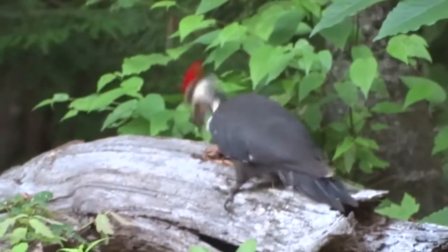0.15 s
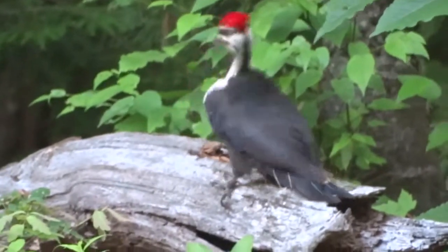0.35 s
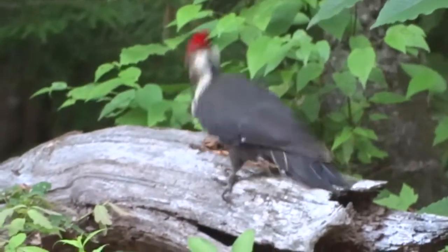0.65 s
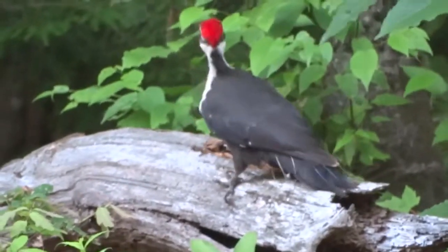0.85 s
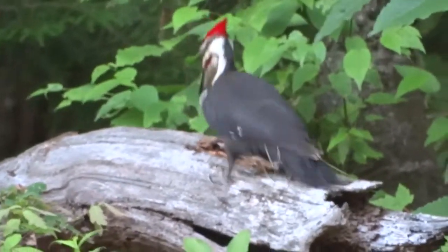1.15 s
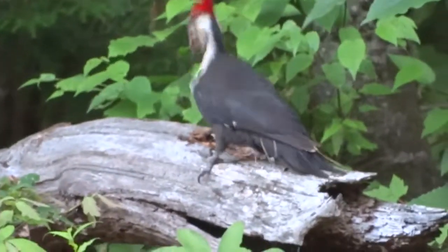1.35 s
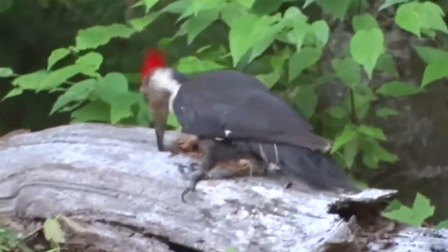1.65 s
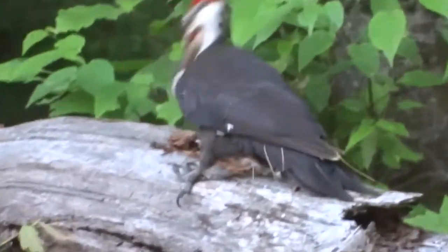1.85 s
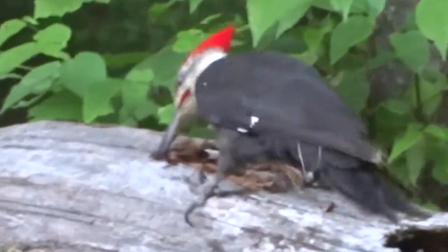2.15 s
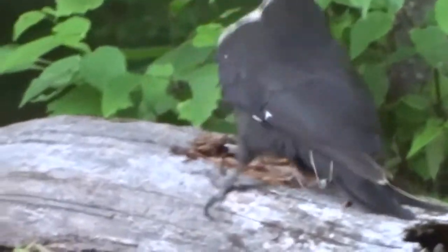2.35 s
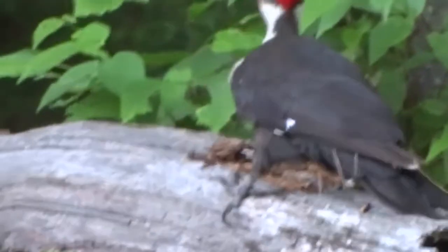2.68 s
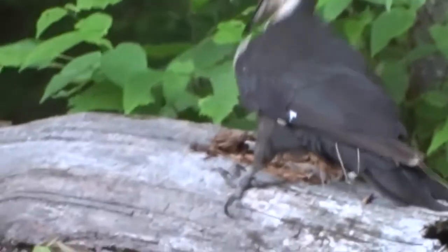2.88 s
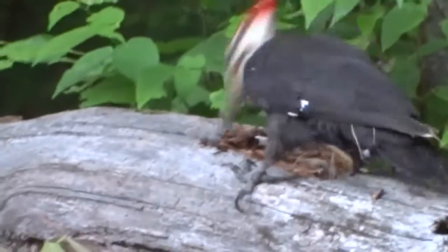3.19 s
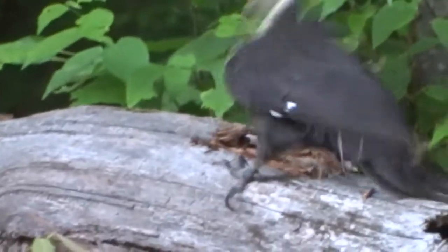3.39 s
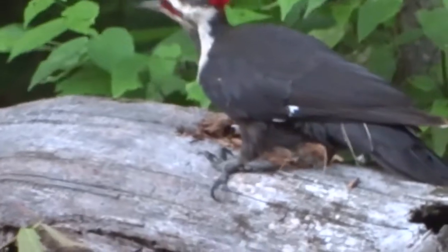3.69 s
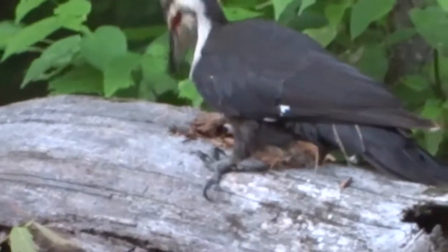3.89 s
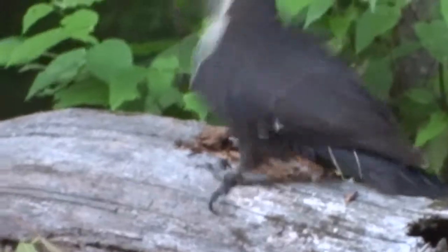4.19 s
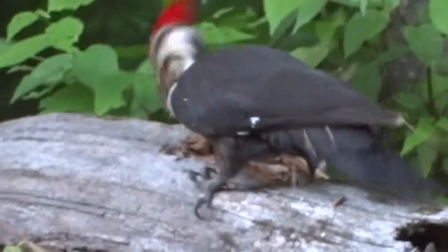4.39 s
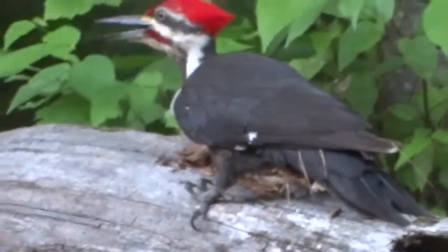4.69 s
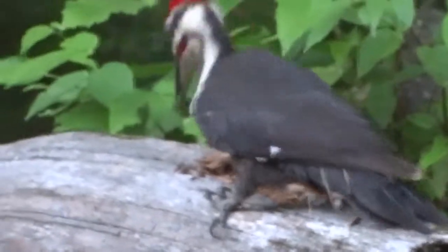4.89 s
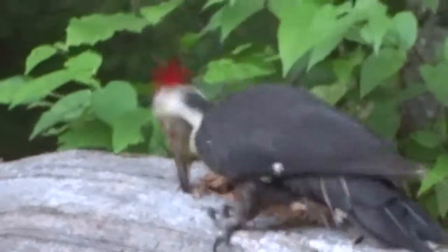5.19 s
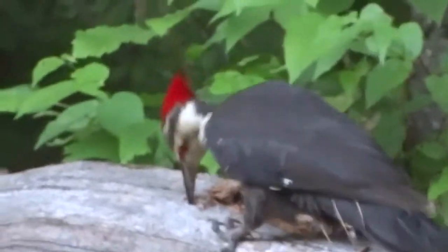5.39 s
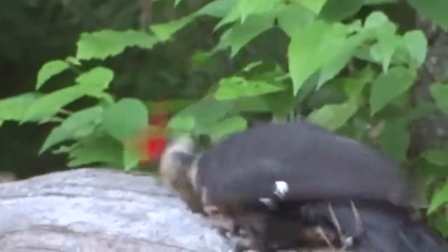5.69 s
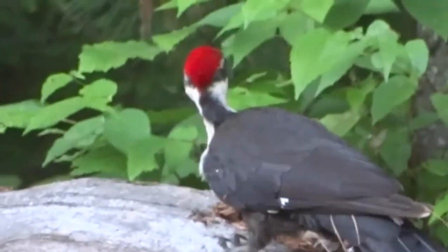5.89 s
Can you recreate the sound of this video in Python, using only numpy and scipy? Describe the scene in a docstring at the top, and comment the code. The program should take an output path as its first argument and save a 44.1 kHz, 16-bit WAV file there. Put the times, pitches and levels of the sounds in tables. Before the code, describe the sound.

Near the microphone, a woodpecker strikes a decaying log in sharp, unevenly spaced single knocks, some hard and some softer, with small crackles of breaking wood and little echo. Distant small birds give high whistles before the first blow, then a fading twitter and a few chirps, and later a very faint pulsing song. A smooth, bright hiss runs under everything in the forest.

```python
"""A steady, bright hiss fills a forest, and a small bird whistles thinly far off among the trees.
Half a second in, a large woodpecker starts chiselling at a rotting log with dry, irregular blows.
Each rings the damp wood for a few milliseconds and leaves a grainy tail; now and then a crumb snaps.
Between the blows come a far twitter, light taps of the bill, thin chirps and two low calls.
About three seconds in, a bird sings with two voices at once; the pecking goes on to the end."""
import sys
import numpy as np
from scipy import signal
from scipy.fft import rfft, irfft
from scipy.io import wavfile
from scipy.ndimage import uniform_filter1d

SR = 44100
rng = np.random.default_rng(int(sys.argv[2]) if len(sys.argv) > 2 else 0)


def waveform_to_disk(signal):
    """Save audio, clipped to [-1, 1], as 16-bit WAV at the path in sys.argv[1]."""
    frames = np.transpose(np.atleast_2d(signal))
    scaled = np.clip(frames, -1, 1) * 32767
    samples = np.round(scaled).astype(np.int16)
    wavfile.write(sys.argv[1], SR, samples)


N = 266496


def gain_of(db):
    """Turns decibels into a number to multiply a sound by."""
    return 10 ** (np.asarray(db) / 20)


def evened(x):
    """Scales a signal to an average strength (rms) of 1."""
    return x / np.sqrt(np.mean(x ** 2) + 1e-20)


def read(points, hz):
    """Looks up a table at any pitch, filling in between its rows."""
    f, value = np.transpose(points)
    return np.interp(np.log(hz + 1), np.log(f + 1), value)


def add(mix, s, sound):
    """Mixes a sound in, starting at s seconds."""
    start = round(s * SR)
    sound = sound[max(-start, 0):]
    part = mix[max(start, 0):][:len(sound)]
    part += sound[:len(part)]


def click_from(spectrum):
    """The quickest-dying click that has the given strength at each pitch."""
    log_gain = np.log(np.maximum(np.concatenate([spectrum, spectrum[-2:0:-1]]), 1e-5))
    return np.fft.ifft(np.exp(np.conj(signal.hilbert(log_gain)))).real


# tone of the hiss: (pitch [Hz], relative level [dB])
HISS_TONE = [(18, -85), (30, -61.5), (69, -41), (177, -39.5), (276, -30), (312, -28), (345, -33),
             (371, -24.5), (537, -19.5), (655, -15), (902, -10.5), (971, -11), (1410, -12.5), (1590, -14.5),
             (1760, -11), (2300, -11), (2880, -8), (3170, -7.5), (4250, -3.5), (4980, 0.63), (5350, -2),
             (5700, -8.5), (6000, -16), (7160, -23), (8100, -26.5), (10900, -48), (14200, -73),
             (22000, -120)]
# how alike left and right are: (pitch [Hz], likeness [-1 to 1])
EAR_LIKENESS = [(60, .82), (550, 0.82), (2400, 0.86), (5200, 0.97), (6500, 0.76), (7300, 0.23),
                (8400, -0.63), (10400, 0.23)]
# drift of the low part: (time [s], level [dB])
LOW_DRIFT = [(0, 7), (.3, 1), (.7, 3.5), (1.2, 1.4), (2.8, 0), (3.7, 1), (4.7, -1.5), (6.04, -1.5)]
# drift of the high part: (time [s], level [dB])
HIGH_DRIFT = [(0, 3), (.65, 4), (1.55, 1), (2.298, 0.9), (3.7, 0), (4.8, -1), (6.04, -2)]
def hiss(treble_lift_db=1.0, patchy_db=1.03):
    """A smooth, bright background whose low and high parts slowly swell and sink."""
    frames, hz = N // 256 + 5, np.fft.rfftfreq(1024, 1 / SR)
    t = np.arange(frames) * 256 / SR
    a, b, c, d, patches = rng.standard_normal((5, frames, len(hz)))
    likeness = read(EAR_LIKENESS, hz)
    left = a + 1j * b
    right = likeness * left + np.sqrt(1 - likeness ** 2) * (c + 1j * d)
    tone = gain_of(read(HISS_TONE, hz)) * np.clip(hz / 30, 0, 1)
    patches = evened(uniform_filter1d(uniform_filter1d(patches, size=14, axis=0), size=12, axis=1))
    low_db, high_db = (np.interp(t, *np.transpose(drift))[:, None] for drift in (LOW_DRIFT, HIGH_DRIFT))
    treble = read([(1500, 0.019), (3000, 0.98)], hz)
    drift_db = (1 - treble) * low_db + treble * (high_db + treble_lift_db)
    spectra = np.array([left, right]) * tone * gain_of(drift_db + patchy_db * patches)
    _, noise = signal.istft(spectra, nperseg=1024, noverlap=768, time_axis=1, freq_axis=2)
    return evened(noise[:, :N])


def note(length, start_hz, end_hz, depth_hz, db, glide_s=0.111, trill_hz=75, waver=0.539, flutter_db=0.7):
    """One bird note: it swells, slides and flutters, and its pitch zigzags in a quick, uneven trill."""
    t = np.arange(int(length * SR)) / SR
    unsteady = evened(uniform_filter1d(rng.standard_normal(SR), 120))[:len(t)]
    flutter = evened(uniform_filter1d(rng.standard_normal(SR), 500))[:len(t)]
    trill = signal.sawtooth(2 * np.pi * (trill_hz * t + rng.random()), .5) + waver * unsteady
    pitch = end_hz + (start_hz - end_hz) * np.exp(-t / glide_s) + depth_hz * trill
    strength = gain_of(db) * evened(gain_of(flutter_db * flutter)) * signal.windows.hann(len(t))
    return strength * np.sin(2 * np.pi * np.cumsum(pitch) / SR)


# the opening whistles: (time [s], length [s], pitch [Hz], level [dB])
WHISTLES = [(-.07, 0.22, 5365, -37), (0.188, 0.24, 5110, -31), (0.595, 0.13, 5210, -35),
            (0.675, 0.13, 5050, -36.5)]
def whistles(scoop_hz=650, under_hz=4720):
    """A bird slides up into each whistle, while a softer, wide trill runs on underneath."""
    out = np.zeros(N)
    for s, length, hz, db in WHISTLES:
        add(out, s, note(length, hz - scoop_hz, hz, depth_hz=180, db=db, glide_s=.028))
        add(out, s, note(0.36, under_hz, under_hz, depth_hz=443, db=-44.5))
    return out


# the log's own ringing notes: (pitch [Hz], width [Hz], level [dB])
LOG_NOTES = [(360, 74, -13), (453, 46, -5.5), (570, 80, -14), (886, 136, -5.5), (1125, 114, 0),
             (1438, 114, -1), (1840, 229, -10), (2287, 234, 6), (3200, 330, -4), (3446, 81, -5.5),
             (3942, 280, 2.5), (4600, 200, -12), (5270, 320, 4)]
# the hard bill's ringing notes: (pitch [Hz], width [Hz], level [dB])
BILL_NOTES = [(7230, 790, 0.5), (8800, 1300, -18)]
# blows of the bill: (time [s], strength [dB], hardness [dB per octave], distance from the hole's edge [m],
#   loose slab's pitch [Hz], slab's boost [dB], crack [dB], bill ring [dB], crushing [dB], thud [dB],
#   grainy tail [dB], time for the tail to fade by 60 dB [s])
BLOWS = [(0.5510, 10, 4, 0.28, 1700, 11, 11, -21, -19, -27, -37.5, 0.79),
         (1.6246, 4, 0.5, 0.17, 4140, 5.5, -12, -22, -20, -35, -53, .11),
         (2.1853, 4, 6, 0.21, 3530, 8, 2, -15.5, -13, -38, -38, 0.19),
         (2.5547, 4, 4.5, .148, 4870, -0.5, -7, -17, -15, -33, -46, 0.26),
         (3.1656, -2.5, -2.2, .131, 3530, 19, -3, -19.5, -15, -45, -45.5, .25),
         (3.5440, 4.2, 5.5, 0.12, 2530, 13.5, -14, -27, -14, -44, -43.5, 0.24),
         (4.3546, 10, 6, 0.12, 1990, 5.5, 7, -9.5, -17, -35, -34, .33),
         (5.223, 3.8, 7, 0.26, 3350, -10, -13, -20, -14, -34, -45, 0.58),
         (5.8045, 4, 8, .14, 1590, 12, 0.5, -23, -2, -36, -39, 0.14),
         (5.8132, -1.5, 7, .27, 1400, 4, -6, -25, -10, -40, -41, 0.94)]
def pecks(wave_m_per_s=607.5, soft_wood_hz=4140, slab_octaves=0.33, bass_lag_s=0.017, bass_hz=320):
    """One hard push of the bill cracks the dry surface, crushes fibres and rings both log and bill."""
    out, t, f = np.zeros(N), np.arange(4096) / SR, np.fft.rfftfreq(4096, 1 / SR)
    crack = 1 / (1 + ((f - 4620) / 450) ** 4)  # a very short, bright snap
    for s, strength_db, hardness, spot_m, slab_hz, slab_db, crack_db, bill_db, crush_db, *_ in BLOWS:
        power = (gain_of(crack_db) * crack) ** 2
        for hz, width_hz, db in BILL_NOTES:
            power += (gain_of(bill_db + db) * peak(f, hz, width_hz)) ** 2
        for hz, width_hz, db in LOG_NOTES:
            push = gain_of(strength_db + hardness * np.log2(hz / 2100)) ** 2  # harder is brighter
            push /= 1 + (hz / soft_wood_hz) ** 11.4  # soft wood dulls the highest notes
            # a note is weak when struck at a spot where its wave hardly moves
            spot_share = 0.3 ** 2 + np.sin(2 * np.pi * hz * spot_m / wave_m_per_s) ** 2
            # a firm slab boosts notes near its own pitch; a spongy one soaks them up
            boost_db = slab_db * np.exp(-(np.log2(hz / slab_hz) / slab_octaves) ** 2)
            power += push * spot_share * (gain_of(db + boost_db) * peak(f, hz, width_hz)) ** 2
        # slow bending waves bring the bass late, by a path that varies from blow to blow
        lag_s = bass_lag_s * rng.uniform(0.601, 1.2)
        bass_delay = np.exp(-2j * np.pi * lag_s * bass_hz * np.arctan(f / bass_hz))
        ring = irfft(rfft(click_from(np.sqrt(power))) * bass_delay)
        crush = rng.standard_normal(len(t)) * gain_of(-60 * t / .018)
        force = (t == 0) + gain_of(crush_db) * crush / np.linalg.norm(crush)
        add(out, s, signal.fftconvolve(force, ring))
    return out


def peak(f, hz, width_hz):
    """How strongly something that rings at hz answers each pitch in f."""
    return 1 / (1 + ((f - hz) / width_hz) ** 2) ** 2


def thuds(below_hz=230):
    """Each blow shoves the heavy log, which gives a dull, toneless puff."""
    out, f = np.zeros(N), np.fft.rfftfreq(4096, 1 / SR)
    puff = click_from(np.clip(f / 30, 0, 1) / (1 + (f / below_hz) ** 4))
    for s, *_, thud_db, _, _ in BLOWS:
        add(out, s, gain_of(thud_db) * puff)
    return out


# bright tone of the tails and crumbs: (pitch [Hz], relative level [dB])
GRAIN_TONE = [(150, -45), (500, -20.5), (1150, -8.5), (1600, -11), (2800, -9), (3300, -6), (4200, 1),
              (4750, 7), (5250, 9.5), (5600, -4.5), (6000, -7.5), (6600, -14.5), (7500, -16.5), (9500, -35),
              (11000, -37)]
# loose crumbs that snap off after a blow: (time [s], level [dB])
CRUMBS = [(.586, -34), (3.214, -42.5), (4.381, -44), (4.444, -38), (5.2335, -40), (5.8195, -35)]
def tails_and_crumbs(grains_per_s=3000, spread_db=3, delay_s=0.007, crumb_fade_s=0.032):
    """A bright, grainy tail scatters back just after each blow and fades; now and then a crumb snaps."""
    out, t = np.zeros(N), np.arange(SR // 2) / SR
    tails = [(s + delay_s, db, fade_s) for s, *_, db, fade_s in BLOWS]
    crumbs = [(s, db, crumb_fade_s) for s, db in CRUMBS]
    for s, db, fade_s in tails + crumbs:
        sizes = gain_of(spread_db * np.minimum(rng.exponential(1, len(t)), 4))
        signs = rng.choice([-1, 1], len(t))
        grains = sizes * signs * (rng.random(len(t)) < grains_per_s / SR)
        add(out, s, evened(grains) * gain_of(db - 60 * t / fade_s))
    grain = click_from(gain_of(read(GRAIN_TONE, np.fft.rfftfreq(2048, 1 / SR))))
    return signal.oaconvolve(out, grain / np.linalg.norm(grain))[:N]


def twitter(start_s=0.78, every_s=.185, lead_s=0.044, climb_hz_per_s=500, fade_db_per_s=9):
    """Four evenly spaced calls climb and fade; each is a held note on top of a wide trill."""
    out = np.zeros(N)
    for since in np.arange(4) * every_s:
        climb_hz, fade_db = climb_hz_per_s * since, fade_db_per_s * since
        low_hz, held_hz = 5500 + climb_hz, 6380 + climb_hz
        add(out, start_s + since, note(0.35, low_hz, low_hz, depth_hz=600, db=-44 - fade_db))
        add(out, start_s + since - lead_s, note(0.2, held_hz, held_hz, depth_hz=142, db=-53.5 - fade_db))
    return out


# light taps: (time [s], time to fade by 60 dB [s], pitch [Hz], width [Hz], level [dB])
TAPS = [(1.142, .04, 1910, 1000, -45), (1.1608, 0.03, 2010, 1050, -37), (1.183, 0.033, 2200, 1000, -43.5),
        (2.107, 0.1, 1750, 300, -49), (5.884, 0.12, 1790, 600, -51)]
def taps():
    """The bill touches the bark, and the log rings softly and briefly around one pitch."""
    out, t, f = np.zeros(N), np.arange(SR) / SR, np.fft.rfftfreq(SR, 1 / SR)
    for s, fade_s, hz, width_hz, db in TAPS:
        ring = click_from(peak(f, hz, width_hz))
        rub = rng.standard_normal(SR) * gain_of(db - 60 * t / fade_s)
        add(out, s, signal.fftconvolve(rub, ring / np.linalg.norm(ring))[:SR])
    return out


# thin, high chirps: (time [s], length [s], start pitch [Hz], target pitch [Hz], level [dB])
CHIRPS = [(1.15, 0.074, 6030, 4840, -45), (1.215, 0.063, 7200, 7100, -59), (1.345, .05, 5900, 5120, -46),
          (2.71, 0.15, 6500, 6830, -66)]
# two low, falling calls: (time [s], length [s], start pitch [Hz], target pitch [Hz], level [dB])
LOW_CALLS = [(1.37, .26, 1200, 1100, -58), (1.66, .3, 1060, 960, -62)]
def sliding_calls(calls, depth_hz):
    """Single bird notes, each sliding from one pitch toward another with a slight trill."""
    out = np.zeros(N)
    for s, length, start_hz, end_hz, db in calls:
        add(out, s, note(length, start_hz, end_hz, depth_hz, db))
    return out


# notes sung with two voices: (time [s], length [s], trill depth [Hz], level [dB])
DOUBLE_NOTES = [(3.0, .17, 130, -59), (3.21, .18, 400, -58), (3.53, .46, 80, -54)]
def two_voiced_song(low_hz=6160, high_hz=7840, lead_s=.025, throb_hz=18.4, throb_db=8.5):
    """One bird sings two pulsing pitches at once; its wavering notes settle into a clear one."""
    out = np.zeros(N)
    for s, length, depth_hz, db in DOUBLE_NOTES:
        t = np.arange(int(length * SR)) / SR
        throb = gain_of(throb_db * np.sin(2 * np.pi * throb_hz * t))
        add(out, s, throb * note(length, low_hz, low_hz, depth_hz, db))
        add(out, s - lead_s, throb * note(length, high_hz, high_hz, depth_hz, db - 9.5))
    return out


def echoes(x, fade_s, gap_s):
    """Trunks and leaves scatter a sound into a dying cloud of echoes, a little different in each ear."""
    t = np.arange(SR) / SR
    bounces = rng.standard_normal((2, SR)) * (rng.random((2, SR)) < .05)
    middle, side = bounces * (t > gap_s) * gain_of(-60 * t / fade_s)
    tails = np.array([middle + 0.33 * side, middle - 0.14 * side])
    return signal.fftconvolve(x[None], tails / np.linalg.norm(tails[0]), axes=1)[:, :N]


def scene():
    """The log is near, with little echo or bass; the far birds are as much echo as direct sound."""
    bass_cut = signal.butter(2, 140, "high", fs=SR, output="sos")
    wood = signal.sosfilt(bass_cut, pecks() + tails_and_crumbs() + taps())
    birds = whistles() + twitter() + sliding_calls(CHIRPS, depth_hz=80)
    birds += two_voiced_song() + sliding_calls(LOW_CALLS, depth_hz=70)
    near = wood + thuds() + gain_of(-13) * echoes(wood, fade_s=1.0, gap_s=0.015)
    far = gain_of(-4) * (birds + echoes(birds, fade_s=0.4, gap_s=0.005))
    return near + far + gain_of(-44.5) * hiss()


def record(dry, top_hz=11050):
    """The right microphone is a little more sensitive, and the highest treble is cut away."""
    heard = dry * gain_of([[-.5], [.5]])
    treble_cut = signal.firwin(511, top_hz, window=("kaiser", 9), fs=SR)
    return signal.oaconvolve(heard, treble_cut[None], "same")


dry = scene()
out = record(dry)
waveform_to_disk(out)
```